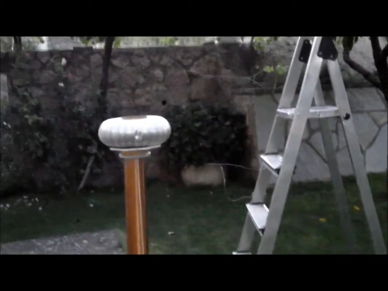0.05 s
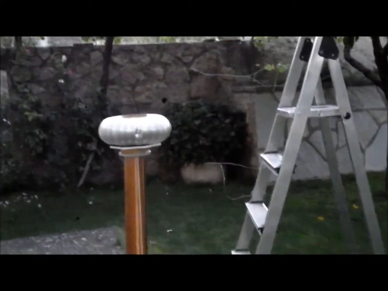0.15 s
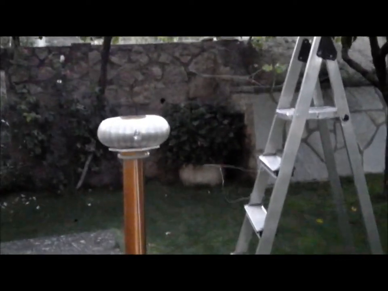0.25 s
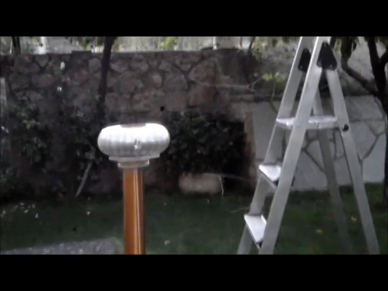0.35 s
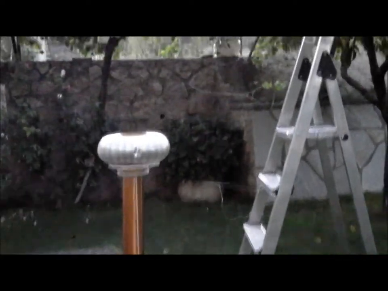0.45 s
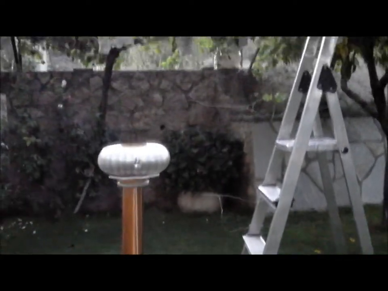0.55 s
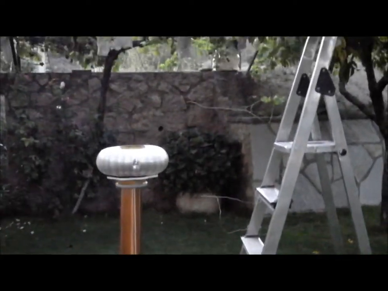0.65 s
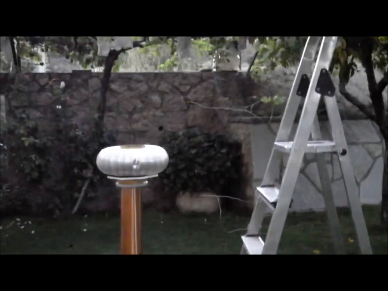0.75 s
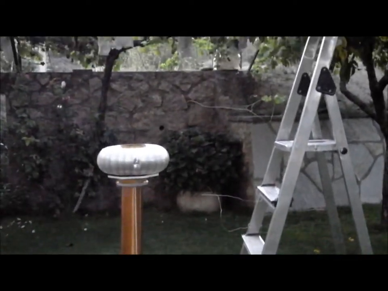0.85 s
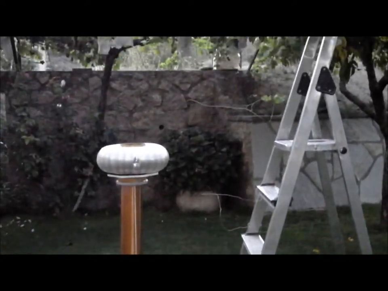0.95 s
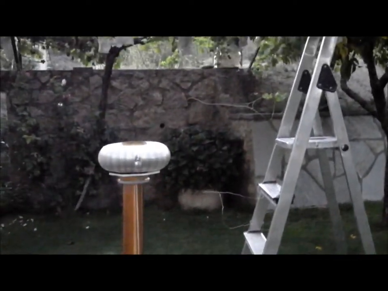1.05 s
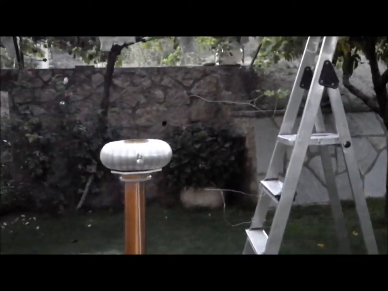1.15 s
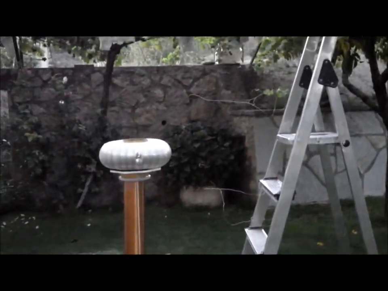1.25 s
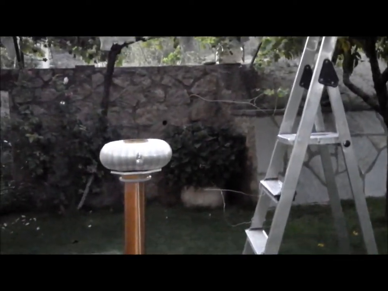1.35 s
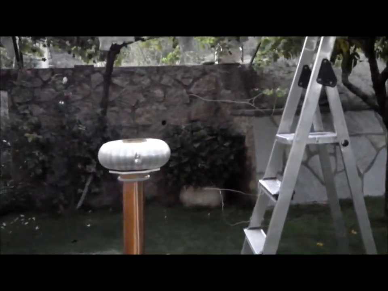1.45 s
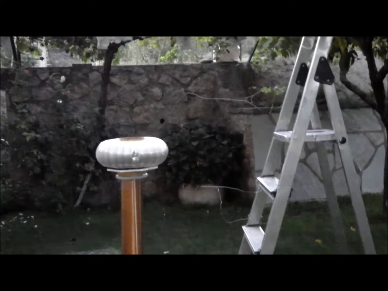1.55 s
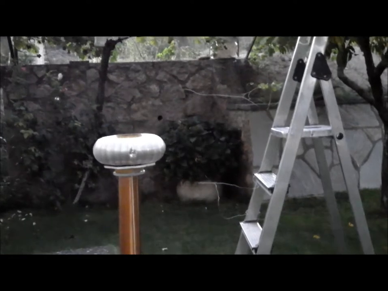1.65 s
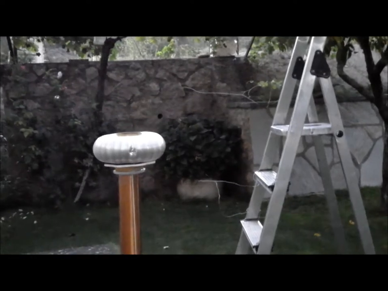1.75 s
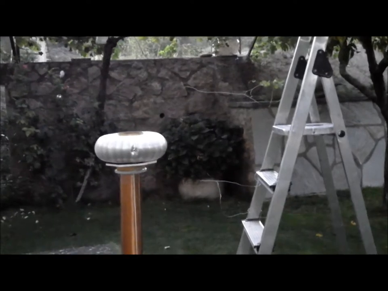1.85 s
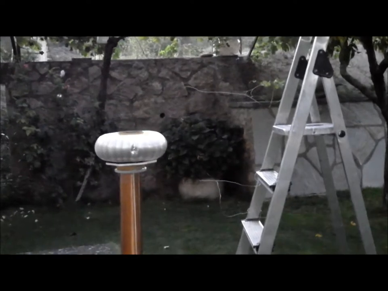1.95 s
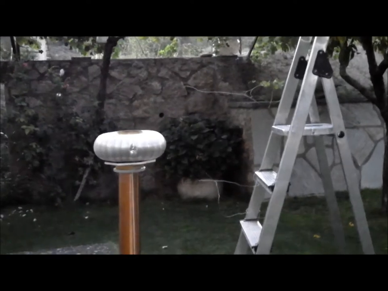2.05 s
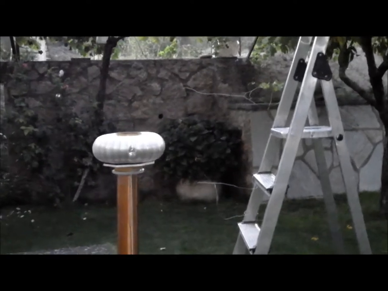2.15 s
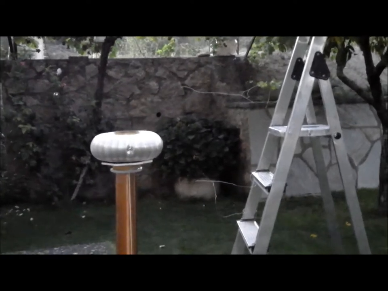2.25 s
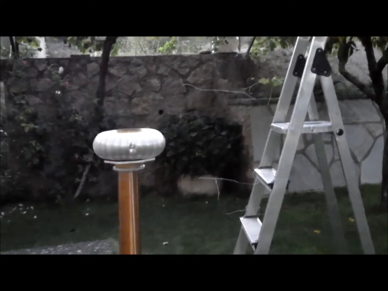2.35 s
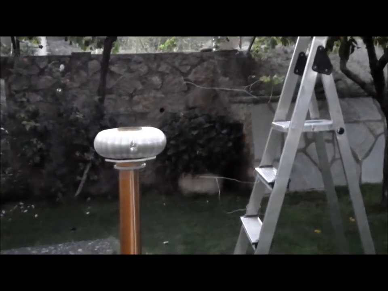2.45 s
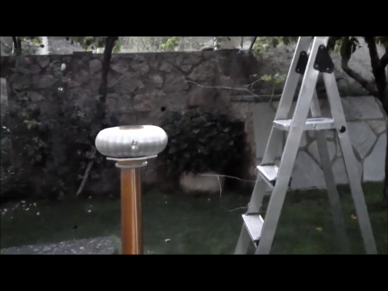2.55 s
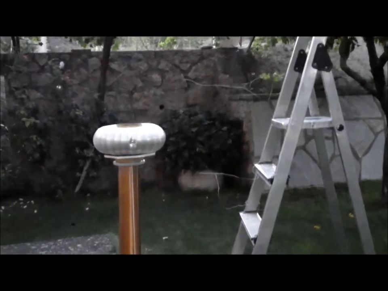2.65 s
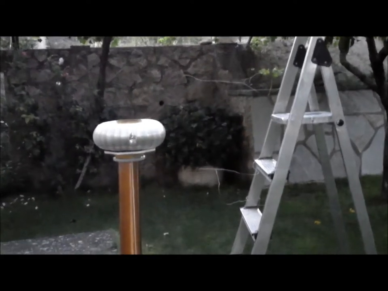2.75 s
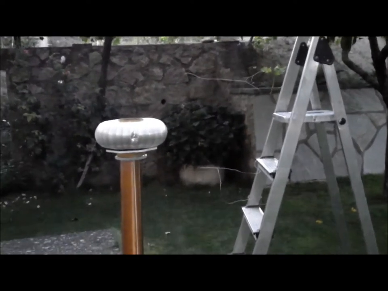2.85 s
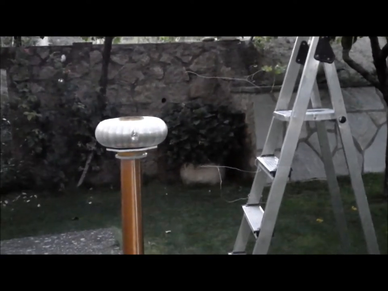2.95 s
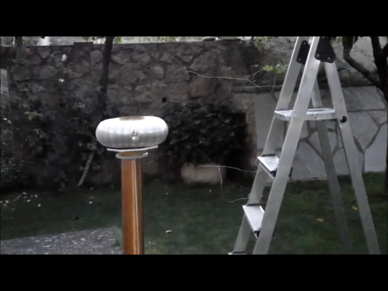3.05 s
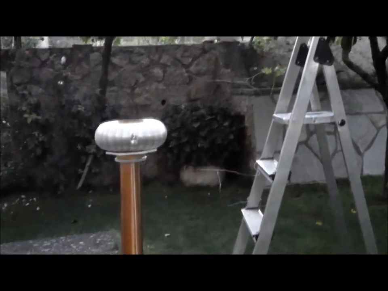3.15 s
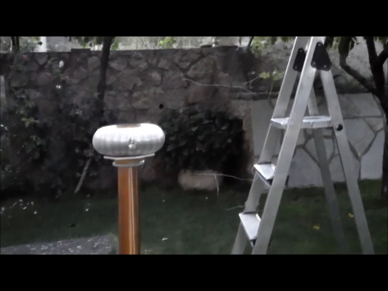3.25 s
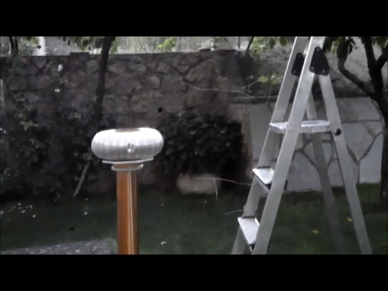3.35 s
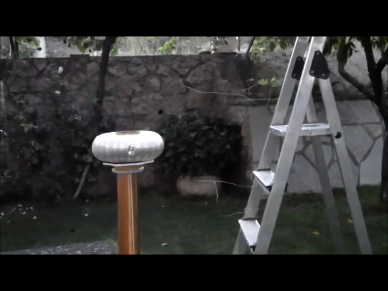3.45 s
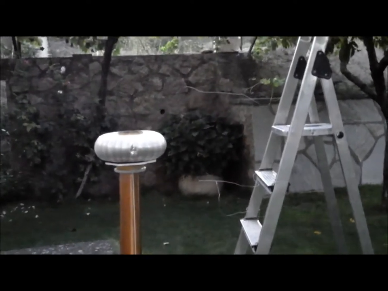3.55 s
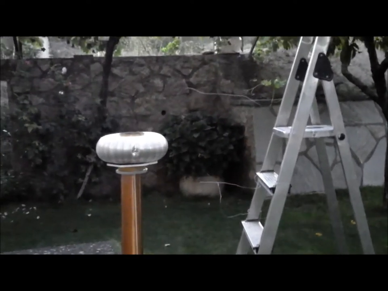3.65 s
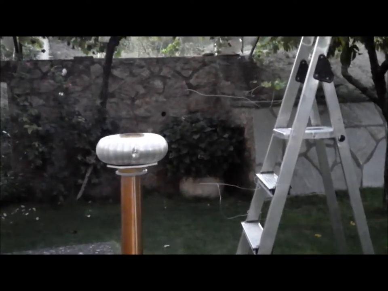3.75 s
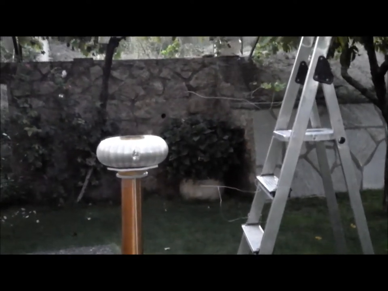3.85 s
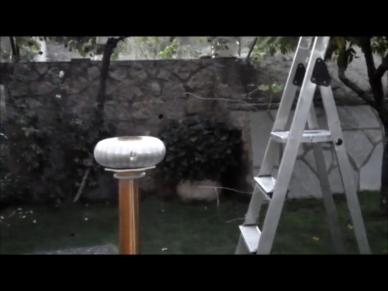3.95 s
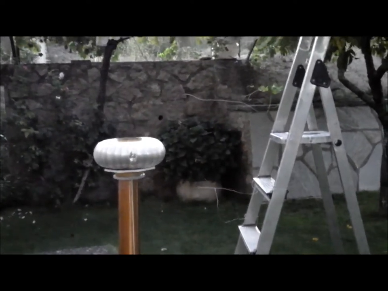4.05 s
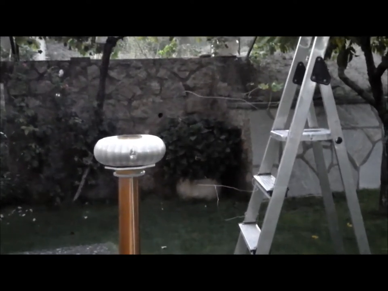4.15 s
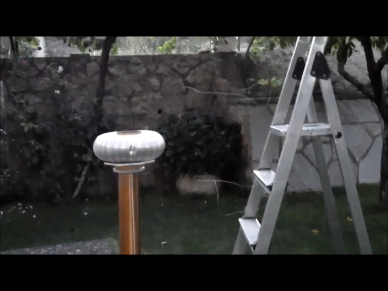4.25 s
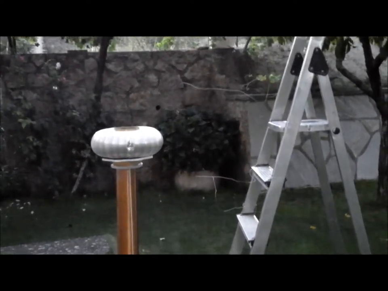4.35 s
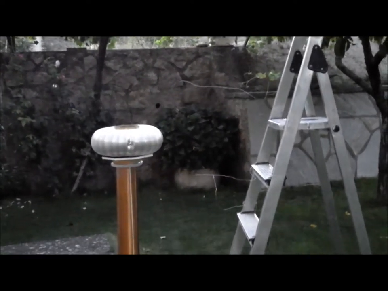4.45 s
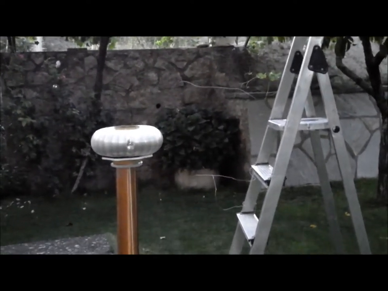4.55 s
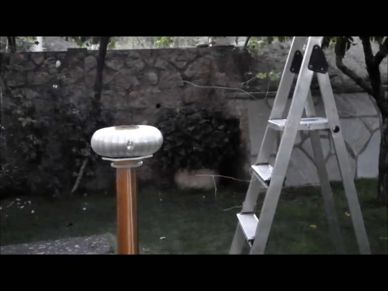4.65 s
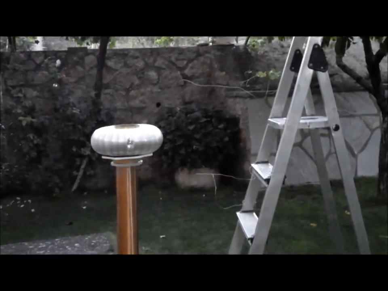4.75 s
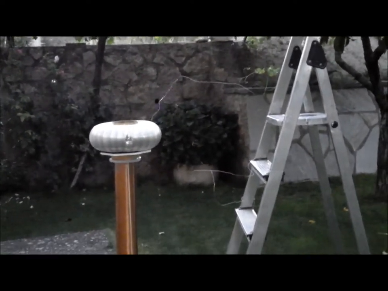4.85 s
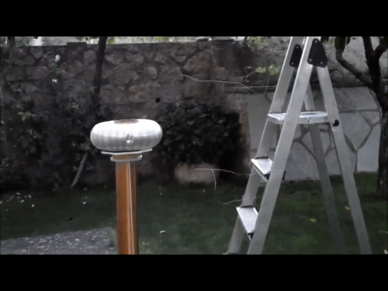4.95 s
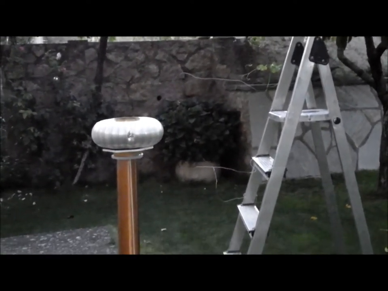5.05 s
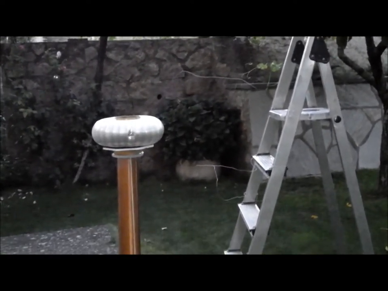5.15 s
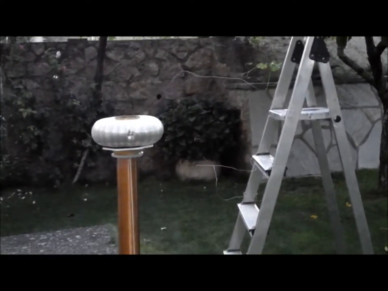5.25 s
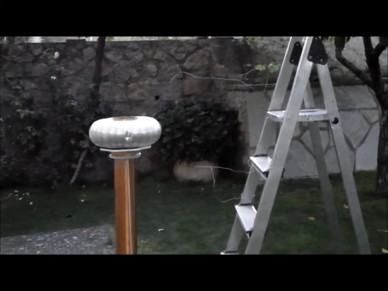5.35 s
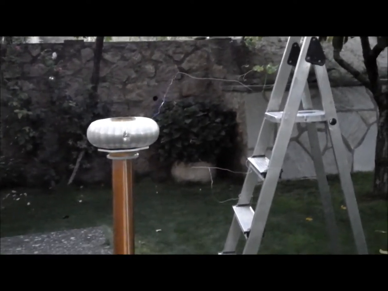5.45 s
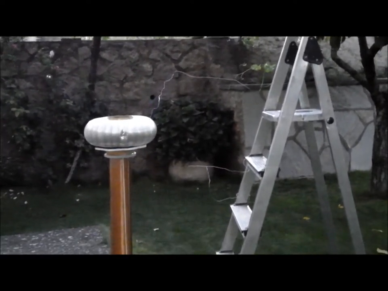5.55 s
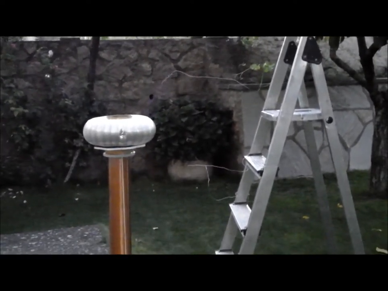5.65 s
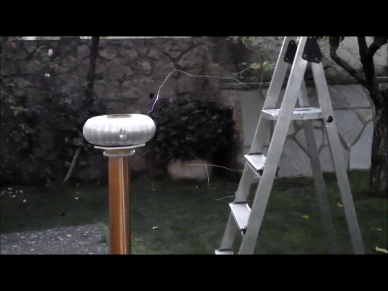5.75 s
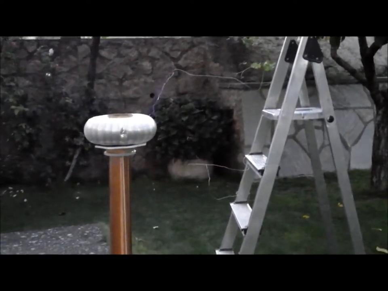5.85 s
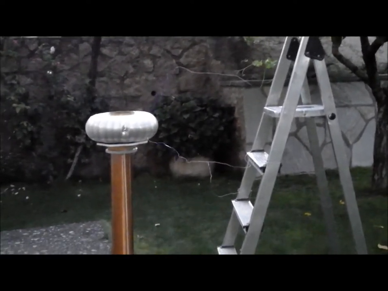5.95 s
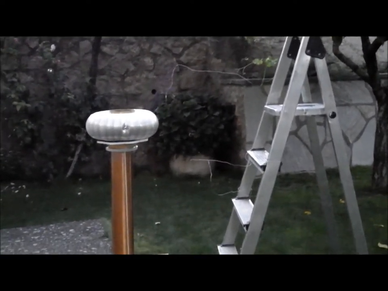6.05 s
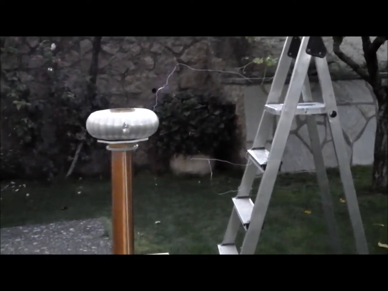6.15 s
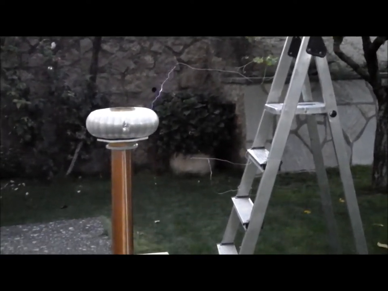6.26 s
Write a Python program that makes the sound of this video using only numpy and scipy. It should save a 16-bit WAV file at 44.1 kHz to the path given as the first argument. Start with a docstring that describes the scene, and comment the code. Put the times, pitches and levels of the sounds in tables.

```python
"""A blower rushes, drones and whines in a walled garden: shaped noise under a slowly bending sine.
A switch clicks: a handful of short decaying sines. Then a spark-gap coil opens with a few heavy shocks.
It goes on firing, each time heard twice: the streamer's snap first, then the gap's bang with its echoes
and a bright scattered tail, all filtered impulses and noise.
A small stereo microphone overloads on the first bang and turns its gain down."""
import sys
import numpy as np
from scipy import signal
from scipy.io import wavfile
from scipy.ndimage import uniform_filter1d

SR = 44100
rng = np.random.default_rng(int(sys.argv[2]) if len(sys.argv) > 2 else 0)


def field_ratio(decibels):
    """Amplitude ratio for a level in dB (20 dB per decade); scalars and array-likes work."""
    return 10 ** (np.asarray(decibels, dtype=float) / 20)


def generate_wav(sig):
    """Save sig (samples, or channels by samples) to the path in sys.argv[1] as 16-bit PCM at SR."""
    pcm = np.round(np.clip(np.atleast_2d(sig).T, -1, 1) * 32767).astype(np.int16)
    wavfile.write(sys.argv[1], SR, pcm)


N = 277389  # samples in the scene
RIGHT_LAG_S = .00003  # path difference between the two microphone ports


def read(points, hz):
    """A table value, interpolated on a log-frequency axis."""
    f, value = np.transpose(points)
    return np.interp(np.log(hz + 1), np.log(f + 1), value)


def humps(rows, hz):
    """Resonances as bell-shaped boosts and dips in dB."""
    return sum(db / (1 + (2 * (hz - f) / width) ** 2) for f, width, db in rows)


def coloured(x, shape_db):
    """Causal filter: the phase follows from the log gain, so nothing rings ahead of its impulse."""
    hz = abs(np.fft.fftfreq(8192, 1 / SR))
    log_gain = np.log(field_ratio(shape_db(hz)))
    response = np.exp(np.conj(signal.hilbert(log_gain)))
    taps = np.fft.ifft(response).real[:4096]
    return signal.oaconvolve(x, taps[None], axes=1)[:, :N]


def train(start_s, level_db):
    """Impulses at exact moments between samples, a little later at the right port."""
    out, k = np.zeros((2, N + SR)), np.arange(-16, 17)
    for side in range(2):
        at = (np.asarray(start_s) + side * RIGHT_LAG_S)[:, None] * SR
        place = np.round(at).astype(int) + k
        pulse = np.sinc(place - at) * np.hanning(len(k))
        np.add.at(out[side], place, field_ratio(np.asarray(level_db))[:, None] * pulse)
    return out[:, :N]


# left-right likeness of diffuse sound, for the air and the scatter: frequency_hz, likeness (1 = same)
LIKENESS = [(130, 0.95), (400, 1), (1400, 0.93), (3100, 0.82), (7000, 0.27), (15000, 0.37)]
# slope of the blower's air noise: frequency_hz, relative level_db
AIR_SLOPE = [(60, -43), (130, -42.5), (220, -20.5), (350, -8.5), (450, 0), (700, -11.5), (1200, -20.5),
             (2200, -14.5), (4000, -21), (7000, -21), (11000, -25), (15750, -33)]
# broad humps on that slope: frequency_hz, width_hz, level_db
AIR_HUMPS = [(1716, 390, 8.5), (2140, 470, -7.5), (2830, 235, 8.5), (4710, 300, 5)]
# narrow drones of the blower duct on that slope: frequency_hz, width_hz, level_db
DUCT_DRONES = [(300, 11, 11), (409, 30, 11), (432, 16, -4), (472, 40, 6), (515, 12, -6), (530, 18, 3),
               (572, 22, 5), (589, 10, -5), (605, 16, 5), (622, 12, -6)]
# blade tone, sinking overall as the motor slows: time_s, pitch_hz, rms level_db
BLADE_WHINE = [(0, 2383, -63.5), (0.9, 2380, -61), (1.6, 2376, -56), (2.75, 2363, -51.5), (3.5, 2343, -54),
               (4.5, 2353, -57.5), (4.88, 2329, -53)]


def blower():
    """Turbulent air in soft patches, narrow duct drones, and a blade tone whose pitch slowly bends."""
    air_rms_db, patch_db = -38.5, 1.19
    frames, hz = N // 2048 + 5, np.fft.rfftfreq(8192, 1 / SR)[:, None]
    a, b, c, d, patches = rng.standard_normal((frames, len(hz), 5)).T
    patches = uniform_filter1d(patches, size=60, axis=0)  # across frequency bins
    patches = uniform_filter1d(patches, size=2, axis=1)  # across time frames
    same = np.clip(read(LIKENESS, hz), -1, 1)
    late = np.exp(-2j * np.pi * hz * RIGHT_LAG_S)
    left = a + 1j * b
    right = late * same * left + np.sqrt(1 - same ** 2) * (c + 1j * d)
    colour_db = read(AIR_SLOPE, hz) + humps(AIR_HUMPS + DUCT_DRONES, hz)
    spectrum = np.array([left, right]) * field_ratio(colour_db + patch_db * patches / patches.std())
    air = signal.istft(spectrum, nperseg=8192, noverlap=6144)[1][:, :N]
    time_s, pitch_hz, level_db = np.transpose(BLADE_WHINE)
    t = np.arange(N) / SR
    phase = 2 * np.pi * np.cumsum(np.interp(t, time_s, pitch_hz)) / SR
    whine = np.sqrt(2) * field_ratio(np.interp(t, time_s, level_db)) * np.sin(phase)
    return field_ratio(air_rms_db) * air / air.std() + whine


# ringing modes of the switch: pitch_hz, relative level_db, t60_s
SWITCH_MODES = [(830, 1.5, 0.0085), (980, -14, 0.0065), (2930, 0.5, 0.0063), (3250, 0, 0.0061),
                (3520, -6, 0.0079), (6700, -3, 0.0033)]


def switch():
    """A plastic rocker snaps over: its modes swell within a millisecond and die in a few."""
    start_s, peak_db, rise_s = 2.4336, -10.5, .0011
    t = np.arange(2000) / SR
    ring = sum(field_ratio(db - 60 * t / t60) * np.sin(2 * np.pi * hz * t) for hz, db, t60 in SWITCH_MODES)
    ring *= np.sin(np.pi / 2 * np.minimum(t / rise_s, 1)) ** 2
    ring = signal.lfilter(*signal.butter(2, 450, "high", fs=SR), ring)
    click = ring[None] / abs(ring).max()
    return signal.oaconvolve(train([start_s], [peak_db]), click, axes=1)[:, :N]


# the first arc breaks cold air in a few heavy shocks: start_s, level_db, shock_length_s
FIRST_SHOCKS = [(4.8892, 13, 0.000066), (4.88945, 0, 0.00016), (4.8897, 16, 0.000032),
                (4.8894, -10.5, 0.0016)]


def first_arc():
    """Pressure shocks, each a push and a longer pull."""
    out, t = np.zeros((2, N)), np.arange(400) / SR
    for start_s, level_db, length_s in FIRST_SHOCKS:
        shock = (1 - t / length_s) * np.exp(-t / length_s)
        out -= signal.oaconvolve(train([start_s], [level_db]), shock[None], axes=1)[:, :N]
    return out


# decay of the garden, before the extra fall set by each caller: frequency_hz, t60_s
GARDEN_DECAY = [(400, 0.06), (1300, 0.15), (3500, 0.26), (9000, 0.32), (14000, 0.18)]


def scatter(length_s, rise_s, extra_fall_db_per_s=1):
    """Reflections from stone, leaves and ladder, each band dying at its own speed; left energy 1."""
    noise = rng.standard_normal((2, round(length_s * SR)))
    hz, t, z = signal.stft(noise, SR, nperseg=128)
    uneven_db = 1.6 * rng.standard_normal((len(hz) // 5, 1)).repeat(5, 0)
    left, other = z * field_ratio(uneven_db)
    same = np.clip(read(LIKENESS, hz) * 1.06, -1, 1)[:, None]
    late = np.exp(-2j * np.pi * hz * RIGHT_LAG_S)[:, None]
    right = same * left * late + np.sqrt(1 - same ** 2) * other
    decay = field_ratio(-60 * t / read(GARDEN_DECAY, hz)[:, None])
    tail = signal.istft(np.array([left, right]) * decay, SR, nperseg=128)[1]
    t = np.arange(tail.shape[1]) / SR
    lumps = uniform_filter1d(rng.standard_normal(len(t)), size=90)  # separate walls, separate clumps
    lumps_db = 2.2 * lumps / lumps.std()
    tail *= field_ratio(lumps_db - extra_fall_db_per_s * t) * np.clip(t / rise_s, 0, 1)
    return tail / np.linalg.norm(tail[0])


# hard echoes of the gap from ground, base and wall: delay_s, level_db against the gap
GAP_ECHOES = [(.00017, -2), (.00068, -1), (.00084, -5), (.00105, -4), (.002, -11), (.0031, -12)]
# the housing of the gap rings after each bang: frequency_hz, width_hz, level_db
HOUSING_RING = [(473, 220, 9.5), (3030, 120, 10), (4405, 94, 5.5), (5340, 63, 12.5), (6410, 230, 11),
                (6960, 300, 4), (7320, 1500, 6), (7300, 200, 2), (8750, 500, 7), (10600, 130, -8),
                (11120, 400, 4)]


def gap_bang(gap, start_s, gap_db):
    """The gap sits still, so its echo delays and close scatter repeat; the housing rings along."""
    delay_s, echo_db = np.transpose(GAP_ECHOES)
    uneven_db = 1.8 * rng.standard_normal((len(start_s), len(delay_s)))
    echo_s = start_s[:, None] + delay_s
    near = gap + train(echo_s.ravel(), (gap_db[:, None] + echo_db + uneven_db).ravel())
    close = scatter(.017, .0007, extra_fall_db_per_s=3900)
    near += field_ratio(-3) * signal.oaconvolve(gap, close, axes=1)[:, :N]
    return coloured(near, lambda hz: humps(HOUSING_RING, hz))


def streamer_snaps(start_s, streamer_db):
    """Points along the crooked channel arrive a little apart, so each snap has its own colour."""
    lead_s = .0014  # the top of the coil is nearer than the gap
    spread, drop = np.moveaxis(rng.random((len(start_s), 2, 2)), 2, 0)
    snaps = train(start_s - lead_s, streamer_db)
    part_s = start_s[:, None] - lead_s + .0003 * spread
    part_db = streamer_db[:, None] - 6 - 12 * drop
    return snaps + train(part_s.ravel(), part_db.ravel())


def far_scatter(gap, start_s, gap_db):
    """A repeating garden tail of the gap, plus a new tail per firing, stronger when the gap is weaker."""
    usual_gap_db, usual_tail_db, trade, spread_db = 16, 13, 1.05, .7
    tail_db = usual_tail_db + trade * (usual_gap_db - gap_db)
    tail_db = tail_db + spread_db * rng.standard_normal(len(start_s))
    tails = field_ratio(-4.5) * signal.oaconvolve(gap, scatter(.3, .0046), axes=1)[:, :N]
    for when_s, level_db in zip(start_s, tail_db):
        early = scatter(.3, .00072, extra_fall_db_per_s=2300)
        tail = field_ratio(level_db) * (scatter(.3, .0034) + field_ratio(4) * early)
        part = tails[:, round(when_s * SR):][:, :tail.shape[1]]
        part += tail[:, :part.shape[1]]  # adds into tails
    return tails


# firings near peaks of the mains, levels before colouring: start_s, gap_db, streamer_db
COIL_FIRINGS = [(4.891, 21.5, 13.5), (4.9425, 15.5, 17), (4.9926, 16, 13), (5.0329, 17, 9.5),
                (5.072, 16, 14), (5.1205, 17, 17.5), (5.173, 14.5, 5.5), (5.2212, 19, 16),
                (5.2822, 10.5, 15.5), (5.3413, 17.5, 18), (5.3924, 17, 19), (5.4418, 16.5, 16),
                (5.4927, 16.5, 17.5), (5.5415, 16.5, 13), (5.6017, 10, 6.5), (5.6527, 17.5, 18.5),
                (5.7014, 16, 19), (5.7527, 17.5, 11), (5.8018, 16.5, 20.5), (5.852, 17, 17),
                (5.9007, 16.5, 11), (5.9534, 16.5, 12), (5.9826, 18.5, 15), (6.011, 15.5, 6.5),
                (6.0515, 16, 11), (6.0908, 16, 5.5), (6.122, 16, 9), (6.1525, 16.5, 21), (6.1802, 14.5, 16),
                (6.2207, 10.5, 12), (6.2612, 9, 20.5)]
# streamer and far scatter, thinner and brighter than the bang: frequency_hz, level_db
SIZZLE_COLOUR = [(300, -5.5), (1000, 0), (3000, 1.5), (6000, 2), (7300, -1.5), (8500, 2.5), (10500, 3.5),
                 (13000, -0.5), (15500, 1)]
# colour of every firing, raised 3 dB as a whole below: frequency_hz, level_db
BANG_COLOUR = [(60, -36.5), (310, -28.5), (390, -15), (600, -11), (780, -20.5), (1250, -17), (1450, -9),
               (1800, -7.5), (2200, -10), (3000, -8.5), (4000, -8), (7200, -3.5), (11800, 1), (13500, -0.5),
               (15700, -2)]


def coil():
    """Sparks as impulses: streamer snap, gap bang and far scatter share the colour of the bang."""
    start_s, gap_db, streamer_db = np.transpose(COIL_FIRINGS)
    gap = train(start_s, gap_db)
    bright = streamer_snaps(start_s, streamer_db) + far_scatter(gap, start_s, gap_db)
    out = gap_bang(gap, start_s, gap_db) + coloured(bright, lambda hz: read(SIZZLE_COLOUR, hz))
    return -coloured(out, lambda hz: read(BANG_COLOUR, hz) + 3)


def scene():
    """Everything that reaches the two ports."""
    return blower() + switch() + first_arc() + coil()


# cavity and ports of the microphone: frequency_hz, width_hz, level_db
MIC_RESONANCES = [(2963, 122, 4), (4530, 270, 3.5), (6340, 250, 0), (7270, 770, 7.5), (7910, 310, -12),
                  (8390, 496, 2.5), (12300, 130, -0.5)]
# balance of the ports: frequency_hz, left_over_right_db
PORT_TILT = [(100, 0), (400, 1.5), (2400, 1.9), (4400, -1.1), (9000, -0.5), (15000, 0)]


def port_colour(dry):
    """Cavity and port resonances, with the level difference shared between left and right."""
    return np.vstack([coloured(dry[[k]], lambda hz: humps(MIC_RESONANCES, hz) + (.5 - k) * read(PORT_TILT, hz))
                      for k in range(2)])


def band_limit(x):
    """Steep lowpass: the band limit of the delivered file."""
    lowpass = signal.firwin(1001, 15780, window=("kaiser", 7), fs=SR)
    return signal.oaconvolve(x, lowpass[None], "same", axes=1)


def gain_control(x):
    """A small offset, gain that drops within milliseconds and recovers slowly, then overload."""
    offset, threshold_db, grab_s = -.0025, 2.5, .0018
    squeeze = .84  # dB of gain drop per dB over the threshold
    peak_fall_db_per_s = 4.5  # the held peak sinks slowly, so the gain recovers slowly
    x = x + offset
    fall_db = np.arange(N) * peak_fall_db_per_s / SR
    peak_db = 20 * np.log10(abs(x).max(0) + 1e-9)
    held_db = np.maximum.accumulate(peak_db + fall_db) - fall_db
    over_db = np.maximum(held_db - threshold_db, 0)
    slow = np.exp(-1 / (grab_s * SR))
    drop_db = squeeze * signal.lfilter([1 - slow], [1, -slow], over_db)
    return np.clip(x / field_ratio(drop_db), -1, 1)


def roll_off(x):
    """The treble ends steeply here."""
    return signal.sosfilt(signal.butter(12, 16420, fs=SR, output="sos"), x)


def record(dry):
    """The scene through the small stereo microphone and its gain control, as delivered."""
    mix = gain_control(band_limit(port_colour(dry)))
    return roll_off(mix)


dry = scene()
out = record(dry)
generate_wav(out)
```